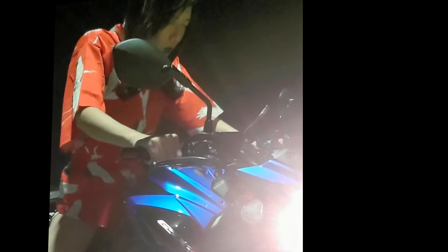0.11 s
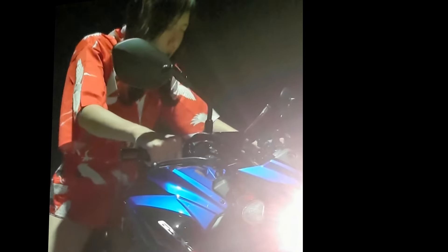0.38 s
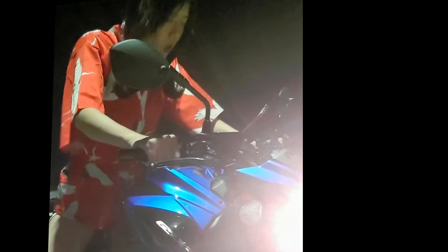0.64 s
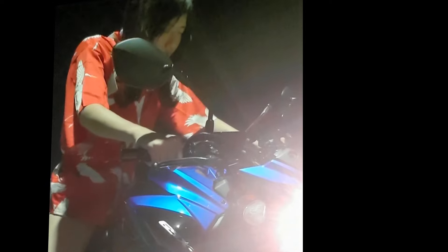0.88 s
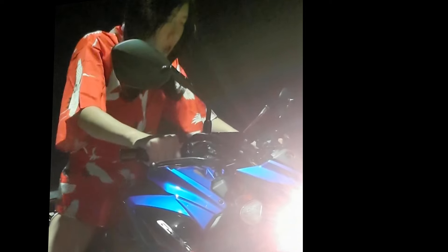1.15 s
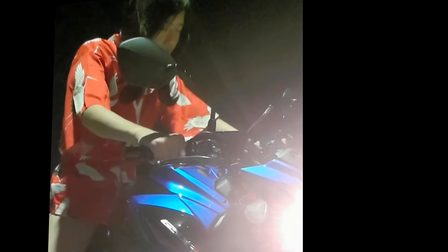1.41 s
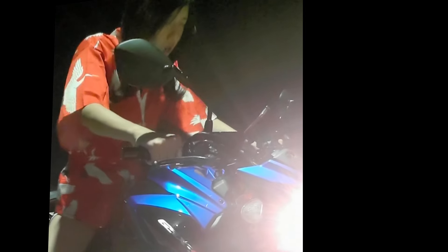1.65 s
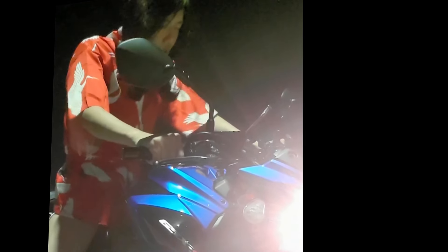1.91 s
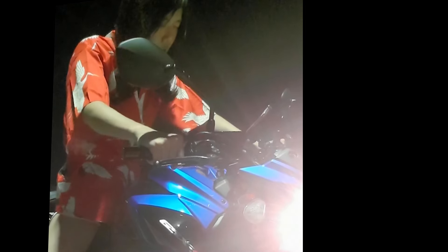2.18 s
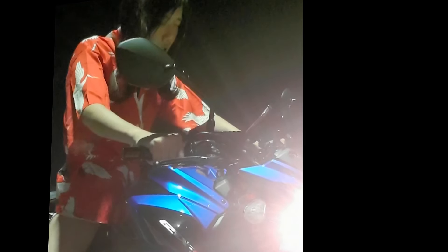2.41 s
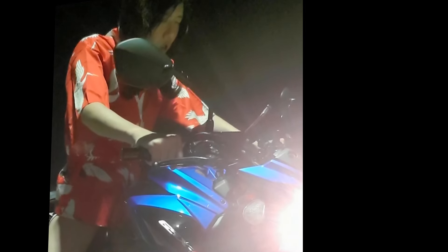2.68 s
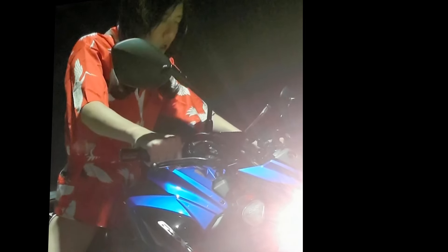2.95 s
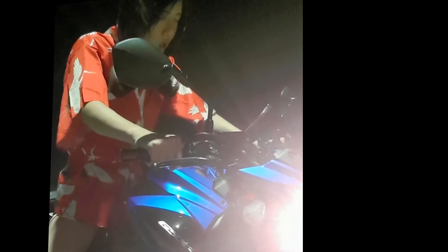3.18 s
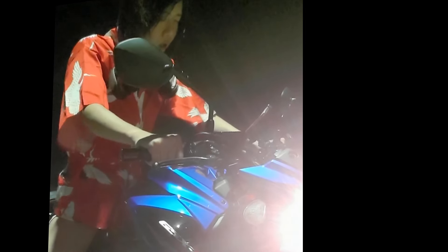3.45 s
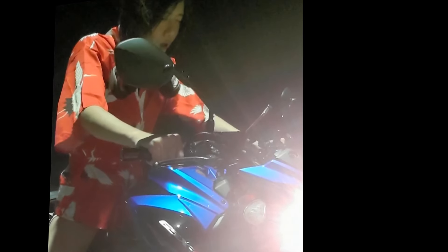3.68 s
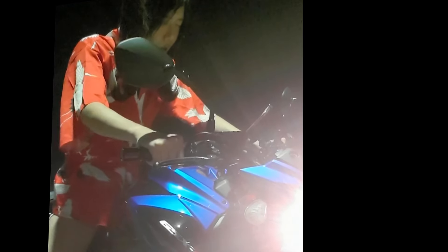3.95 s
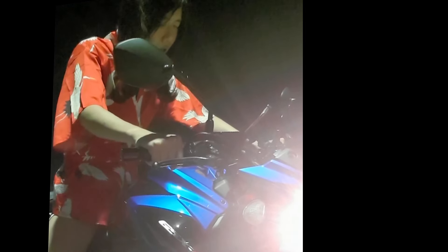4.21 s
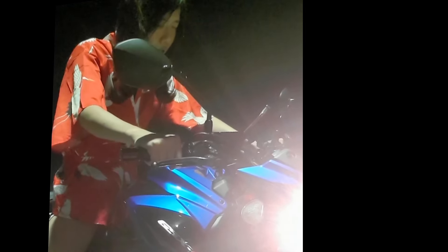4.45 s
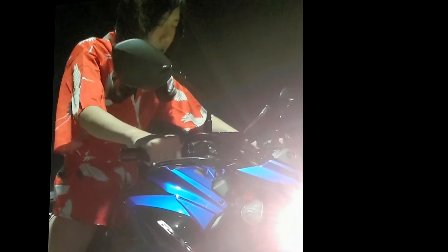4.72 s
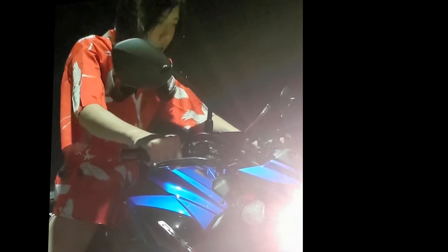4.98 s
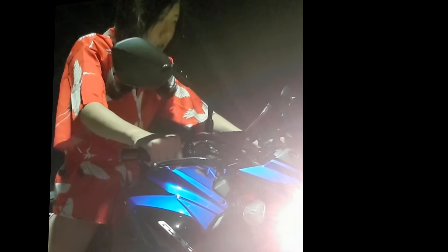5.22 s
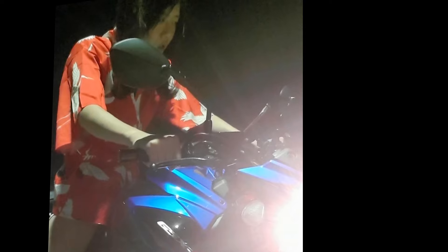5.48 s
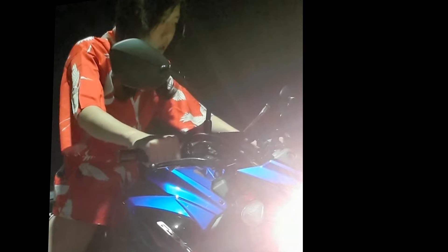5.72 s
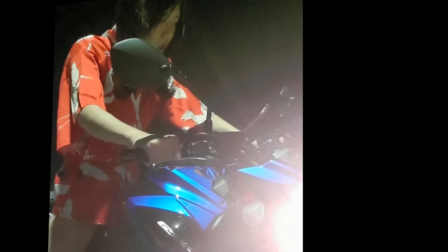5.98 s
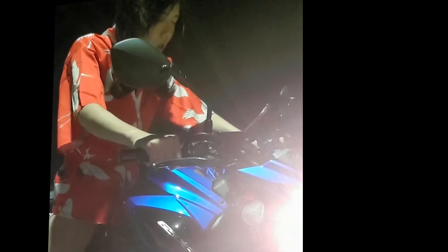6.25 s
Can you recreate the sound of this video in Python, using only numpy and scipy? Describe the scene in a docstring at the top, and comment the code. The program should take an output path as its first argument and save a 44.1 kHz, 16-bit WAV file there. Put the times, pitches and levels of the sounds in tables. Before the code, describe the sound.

Close outdoor motorcycle revving: four short growling bursts, a sagging uneven rumble, one weaker blip, a sputtering stumble, then a steady strong-weak throb.

```python
"""A motorcycle engine close by roars through four twists of the throttle, sinks and hunts, takes a fifth
twist, stumbles, catches again and settles into a steady strong-weak beat.
Firings give harmonic exhaust partials; uneven firings ring the silencer as thumps or half-rate partials.
Filtered noise and partials give the intake, rasp, overrun hiss and valve gear; sputters mark the stumble.
A little low-pitched air stirs on the two microphone ports."""
import sys
import numpy as np
from scipy import signal
from scipy.fft import rfft, irfft
from scipy.io import wavfile
from scipy.ndimage import uniform_filter1d

SR = 44100
rng = np.random.default_rng(int(sys.argv[2]) if len(sys.argv) > 2 else 0)


def to_wav(s):
    """Save 16-bit WAV."""
    ch = np.atleast_2d(s).T  # columns
    pcm = np.round(np.clip(ch, -1, 1) * 32767)  # PCM
    wavfile.write(sys.argv[1], SR, pcm.astype(np.int16))


def elevation(decibels):
    """Turn decibel levels (scalar or array-like) into linear amplitude ratios."""
    levels = np.asarray(decibels, float)
    return 10 ** (levels / 20)


N = 280917


def rms_one(x):
    """Energy normalisation: scale to rms 1."""
    return x / np.sqrt(np.mean(x ** 2) + 1e-20)


def in_time(rows):
    """Linear interpolation: columns of a curve table, sample by sample."""
    s, *columns = np.transpose(rows)
    return [np.interp(np.arange(N) / SR, s, c) for c in columns]


def at_hz(points, hz):
    """Logarithmic frequency: a table over frequency, read on a log axis."""
    table_hz, values = np.array(points)[:, 0], np.array(points)[:, 1]
    return np.interp(np.log(hz + 1), np.log(table_hz), values)


def smooth(x, seconds):
    """Moving average: a centred running mean."""
    return uniform_filter1d(x, max(int(seconds * SR), 1))


def trail(x, seconds):
    """First-order relaxation: follows x with a lag."""
    r = np.exp(-1 / (seconds * SR))
    return signal.lfilter([1 - r], [1, -r], x, zi=[r * x[0]])[0]


def resonate(x, modes):
    """Modal superposition: parallel resonances with alternating signs."""
    out = 0
    for k, (hz, width, level_db) in enumerate(modes):
        r = np.exp(-np.pi * width / SR)
        a = [1, -2 * r * np.cos(2 * np.pi * hz / SR), r * r]
        b = [(1 - r * r) / 2, 0, (r * r - 1) / 2]
        out = out + (-1) ** k * elevation(level_db) * signal.lfilter(b, a, x)
    return out


def per_firing(turns):
    """Cyclic variation: a random value for each unit of turns, joined by straight lines."""
    draws = rng.standard_normal(1000)
    return np.interp(turns, np.arange(len(draws)), draws)


LEFT_DB = -0.6   # left port relative to right
# Phase by which the left port leads the right. Each row: frequency in Hz, lead in radians.
LEFT_LEAD = [(60, .42), (120, .33), (300, .05), (650, -.35), (1210, -1.5), (1890, -2.1), (2670, -4),
             (5000, -4.5), (15000, -4.9)]


def ports(spectrum):
    """Interaural-like difference: the left port is a little softer, ahead in the bass, behind in the treble."""
    turn = elevation(LEFT_DB / 2) * np.exp(.5j * at_hz(LEFT_LEAD, np.fft.rfftfreq(N, 1 / SR)))
    return np.array([spectrum * turn, spectrum / turn])


# Casing resonances that lift the noise. Each row: frequency in Hz, width in Hz, lift in dB.
CASING = [(283, 33, 6.5), (717, 64, 5.5), (1870, 420, 2.5), (2417, 87, 5), (2840, 320, 2), (3640, 610, 3.5),
          (6740, 200, 0.5), (10400, 160, 2)]
# Incoherence of the two ports. Each row: frequency in Hz, share of power unlike in left and right (0-1).
DIFFUSE = [(200, .15), (600, .12), (1400, .25), (3000, .5), (8000, .6)]


def gated_noise(turns, spectrum, low_hz, high_hz, depth, scatter_db, tick_db):
    """Amplitude modulation: noise swells each cycle and ticks twice as valves seat; rms 1 in the band."""
    tick = elevation(tick_db + 2.3 * per_firing(np.floor(2 * turns))) * np.exp(-(2 * turns % 1) / 0.89)
    gate = 1 + depth * np.cos(2 * np.pi * turns) + tick
    white = rng.standard_normal((3, N))
    hz = np.fft.rfftfreq(N, 1 / SR)
    octaves = np.log2(np.clip(hz, low_hz, high_hz * 2) / low_hz)
    parts = 0
    for odd in range(2):   # alternate octaves scatter independently
        scattered = gate * elevation(scatter_db * per_firing(turns)) * white
        parts = parts + rfft(scattered) * np.abs(np.cos(np.pi / 2 * (octaves - odd)))
    lift_db = sum(db / (1 + (2 * (hz - f) / width) ** 2) for f, width, db in CASING)
    direct, left, right = parts * elevation(at_hz(spectrum, hz) + lift_db)
    unlike = np.clip(at_hz(DIFFUSE, hz), 0, 1)
    both = np.sqrt(1 - unlike) * ports(direct) + np.sqrt(unlike) * np.array([left, right])
    band = (hz > low_hz) & (hz < high_hz)
    return irfft(both, N) / np.std(irfft(both.mean(axis=0) * band, N))


# Regularity of the unevenness. Each row: time in seconds, share that is a strong-weak beat (0-1).
BEAT = [(0, .1), (4.9, .1), (5.2, .88), (6.37, .88)]
# Twists of the throttle. Each row: start of the climb in seconds, shutting in seconds,
# speed aimed at in firings per second, opening (0-1).
BLIPS = [(0.066, 0.243, 154.8, 0.88), (0.631, 0.846, 142.5, 0.57), (1.224, 1.456, 137.5, 0.65),
         (1.921, 2.091, 129.5, 0.45), (3.598, 3.784, 109.1, 0.4), (4.579, 4.74, 97, 0.02)]
# Speed the engine falls back to between twists. Each row: time in seconds, speed in firings per second.
SETTLED = [(0, 97), (.6, 92), (1.22, 82), (1.84, 77.5), (2.55, 78.5), (2.68, 75.1), (2.87, 66),
           (3.09, 58.5), (3.3, 55), (3.49, 47.5), (3.6, 51), (3.94, 84.8), (4.12, 74), (4.42, 53),
           (4.58, 47.4), (4.84, 82), (5.22, 75), (5.5, 77.5), (5.6, 75.6), (5.77, 78.6), (5.93, 78.5),
           (6.09, 85), (6.21, 82.5), (6.37, 85)]
# Hunting: each surge starts low and gains speed until the next. Each entry: start in seconds.
SURGES = [2.519, 2.609, 2.721, 2.86, 2.964, 3.07, 3.192, 3.301, 3.391, 3.5]
SAG_HZ_PER_S = 158   # speed lost once the throttle shuts
CATCH_S, THROTTLE_LAG_S = 0.061, 0.053   # throttle opens ahead of the climb; charge follows the grip
CLIMB_BEND = .85   # below 1 the climb is steepest at its start
FLYWHEEL_S = .04   # inertia rounds the speed peaks
SURGE_HZ, BEAT_WANDER_HZ = 10, .7   # speed gained in a surge; random wander on the full steady beat


def speed_and_throttle():
    """Rotational inertia: speed climbs on open throttle, sags to the settled speed, and hunts in surges."""
    t = np.arange(N) / SR
    settled, = in_time(SETTLED)
    per_s, grip = settled, np.zeros(N)
    for opened, shut, peak, opening in BLIPS:
        start = settled[int(opened * SR)]
        progress = np.clip((t - opened) / (shut - opened), 0, 1) ** CLIMB_BEND
        climb = (t >= opened) * (start + (peak - start) * progress)
        per_s = np.maximum(per_s, climb - SAG_HZ_PER_S * np.maximum(t - shut, 0))
        grip = grip + opening * (t > opened - CATCH_S) * (t < shut)
    starts = np.array(SURGES)
    sawtooth = np.interp(t, starts, np.arange(len(starts))) % 1 - .5
    hunting = (t > starts[0]) * (t < starts[-1]) * sawtooth
    wander = BEAT_WANDER_HZ * in_time(BEAT)[0] * per_firing(9 * t)
    speed = smooth(per_s + wander, FLYWHEEL_S) + SURGE_HZ * smooth(hunting, .015)
    return speed, trail(grip, THROTTLE_LAG_S)


NOISE_KNEE_HZ, NOISE_LAG_S = 76.4, 0.074   # in firings per second; in seconds


def octaves_raised(per_s):
    """Logarithmic scaling with lag: octaves of speed above the knee, trailing the engine."""
    return trail(np.maximum(np.log2(per_s / NOISE_KNEE_HZ), 0), NOISE_LAG_S)


# Exhaust tone with the throttle shut, booming near the silencer resonance.
# Each row: speed in firings per second, level in dB.
BOOM = [(45, -12), (55, -17.5), (65, -12.5), (76, -11.5), (84, -15), (95, -17), (120, -21.5), (155, -13)]
# Firing strength as the engine nearly dies and recovers. Each row: time in seconds, level in dB.
STRENGTH = [(0, -3.5), (2.3, 0.5), (2.5, 0), (3.2, 1.5), (3.45, 2), (3.68, 0.5), (3.78, -5.5), (3.9, -4),
            (4.12, -2.5), (4.3, -2.5), (4.37, -7.5), (4.6, -11), (4.88, -10), (5.0, -2), (5.3, 0.5),
            (6.37, 0.5)]
# Bouts of uneven firing, heard as heavy thumps. Each row: time in seconds, peak level in dB.
THUMPS = [(0.089, -7), (0.28, -4.5), (0.419, -11.5), (0.702, -6.5), (0.86, -9), (0.999, -4), (1.171, -6),
          (1.333, -5), (1.479, -9.5), (1.627, -6), (1.731, -7.5), (1.926, -7), (1.978, -10.5),
          (2.119, -6.5), (2.233, -3), (2.341, -7), (2.472, -4), (2.64, -8.5), (3.899, -6), (4.529, -14.5),
          (4.718, -11.5), (4.831, -13.5), (5.002, -11)]
LOAD_DB = 5   # added to the tone at full throttle
THUMP_FADE_DB_PER_S = 158   # either side of a bout
UNEVEN_DB, LIMP_DB = -19, -16   # between bouts; on the steady beat
UNEVEN_DB_PER_OCTAVE, UNEVEN_FOLLOWS = 8.5, 0.48   # growth with raised speed; share of the strength swing


def exhaust_levels(per_s, throttle):
    """Source strength: tone dB from speed, load and strength; unevenness dB from its bouts and between."""
    t = np.arange(N) / SR
    share, = in_time(BEAT)
    strength_db, = in_time(STRENGTH)
    bouts_db = np.max([db - THUMP_FADE_DB_PER_S * abs(t - s) for s, db in THUMPS], axis=0)
    loose_db = UNEVEN_DB + UNEVEN_DB_PER_OCTAVE * octaves_raised(per_s) + UNEVEN_FOLLOWS * strength_db
    steadiness = (share - share.min()) / np.ptp(share)
    between_db = loose_db + (LIMP_DB - loose_db) * steadiness
    tone_db = at_hz(BOOM, per_s) + LOAD_DB * throttle + strength_db
    return tone_db, np.maximum(bouts_db, between_db)


# For each noise: level at low speed, growth per octave of raised speed, full throttle, full steady beat (dB),
# then the share of the strength swing that it follows.
RASP_DB, RASP_DB_PER_OCTAVE, RASP_LOAD_DB, RASP_BEAT_DB, RASP_FOLLOWS = -30.5, 4, 5.5, 2, 0.14
CLATTER_DB, CLATTER_DB_PER_OCTAVE, CLATTER_LOAD_DB, CLATTER_BEAT_DB, CLATTER_FOLLOWS = -59, 13, 8, -2, 0.47


def noise_levels(per_s, throttle):
    """Flow and impact noise scaling: rasp and clatter dB from speed, load, strength and steady beat."""
    share, = in_time(BEAT)
    strength_db, = in_time(STRENGTH)
    raised = octaves_raised(per_s)
    rasp_db = RASP_DB + RASP_DB_PER_OCTAVE * raised + RASP_LOAD_DB * throttle
    rasp_db = rasp_db + RASP_BEAT_DB * share + RASP_FOLLOWS * strength_db
    clatter_db = CLATTER_DB + CLATTER_DB_PER_OCTAVE * raised + CLATTER_LOAD_DB * throttle
    clatter_db = clatter_db + CLATTER_BEAT_DB * share + CLATTER_FOLLOWS * trail(strength_db, 0.19)
    return rasp_db, clatter_db


# Missed firings. Each row: time in seconds, dip in dB, length in seconds before 3 ms is added.
MISFIRES = [(0.579, -27, 0.032), (2.751, -3.5, 0.015), (2.862, -7, 0.01), (2.958, -8.5, 0.022),
            (3.073, -15.5, 0.016), (3.174, -9, 0.0072), (3.382, -20, 0.01), (3.446, -13, 0.026),
            (3.508, -28, 0.035), (3.558, -13, 0.0092), (3.972, -20, 0.035), (4.129, -25.5, 0.018),
            (4.375, -25, 0.06), (4.561, -15, 0.033), (4.792, -19, 0.03), (4.903, -4.5, 0.066),
            (4.966, -37.5, 0.011), (5.114, -5, 0.064), (6.061, -13, 0.0018)]


def misfire_db():
    """Interrupted excitation: short bell-shaped gaps in dB where a firing is missed."""
    t = np.arange(N) / SR
    return sum(db * np.exp(-(2 * (t - s) / (length + 0.003)) ** 2) for s, db, length in MISFIRES)


# Low partials of the tone. Each row: multiple of the firing rate, relative level in dB.
TONE = [(1, 4.5), (2, -20.5), (3, -24.5), (4, -37.5), (5, -33.5)]
# Silencer resonances. Each row: frequency in Hz, width in Hz, level in dB.
SILENCER = [(65.5, 29.8, 4), (50.3, 35, -2.5), (150.3, 12, -8.5), (309.6, 22, -18.5)]
STUMBLE_BELOW_HZ, STUMBLE_TURNS = 88, .07   # firings per second; timing scatter in firing periods
SHARPEN_BELOW_HZ, SHARPEN_DB_PER_OCTAVE = 70, 19   # slow firings are sharper: upper partials rise


def exhaust_tone(per_s, turns, tone_db):
    """Harmonic series: partials of the firing rate, lifted at resonances, jittered at low speed, gapped."""
    share, = in_time(BEAT)
    stumble = (1 - share) * np.clip((STUMBLE_BELOW_HZ - per_s) / 20, 0, 1)
    fired = turns + STUMBLE_TURNS * stumble * per_firing(turns)
    sharp = elevation(SHARPEN_DB_PER_OCTAVE * np.maximum(np.log2(SHARPEN_BELOW_HZ / per_s), 0))
    tone = 0
    for k, level_db in TONE:
        # only the two upper silencer resonances lift the partials
        lift = 1 + sum(2.28 / (1 + (2 * (k * per_s - hz) / width) ** 2) for hz, width, _ in SILENCER[2:])
        waver_db = (.9 + 1.2 * stumble) * per_firing(turns)
        colour = lift * sharp if k > 1 else 1
        tone = tone + elevation(level_db + waver_db) * colour * np.cos(2 * np.pi * k * fired)
    return np.sqrt(2) * elevation(tone_db + misfire_db()) * tone


# Partials of the strong-weak beat. Each row: multiple of the firing rate, relative level in dB.
LIMP = [(.5, 0), (1.5, -4), (2.5, -16.5), (3.5, -27.5)]
LIMP_WAVER_DB = 1.5


def uneven_firing(per_s, turns, uneven_db):
    """Subharmonics: random firing differences ring the silencer; regular ones give half-rate partials."""
    share, = in_time(BEAT)
    fired = np.diff(np.floor(turns), prepend=0) * per_firing(np.floor(turns))
    thumps = resonate(resonate(fired + 1e-18, SILENCER), [(68, 36, 0), (150, 40, -11), (290, 50, -18)])
    thumps = thumps / np.sqrt(smooth(smooth(thumps ** 2, 0.17), 0.17) + 1e-20)
    limp = 0
    for k, db in LIMP:
        waver = elevation(db + LIMP_WAVER_DB * per_firing(turns / 4))
        pipe = 1 + 1.5 / (1 + ((k * per_s - 292) / 12) ** 2)   # lift near a pipe resonance
        limp = limp + waver * pipe * np.cos(2 * np.pi * k * turns + .85 * k - 1)
    return elevation(uneven_db + misfire_db() / 2) * ((1 - share) * thumps + share * np.sqrt(2) * limp)


# Air box resonances. Each row: frequency in Hz, width in Hz, level in dB.
INTAKE = [(384.5, 10, -5), (567.4, 33, 0), (691.5, 30, -5.5), (862, 18, -11.5), (1060, 160, -19.5)]
# Partials through the air box. Each row: multiple of the firing rate, relative level in dB.
GROWL = [(2, 4), (3, 2), (4, 2), (5, 0), (6, 2), (7, -2), (8, -6)]
REV_FROM_HZ, REV_FULL_HZ = 89.3, 120.5   # firings per second over which the intake comes in
OPEN_SHARE = .7   # how much an open throttle sounds the air box even at low speed
INTAKE_DB, INTAKE_LOAD_DB = -40, 14   # gulps; added at full throttle
GROWL_DB, GROWL_LOAD_DB = -36, 13   # partials; added at full throttle


def intake(per_s, throttle, turns):
    """Cavity resonance: gulps of air and firing partials ring the air box, most on open throttle."""
    revved = np.clip((per_s - REV_FROM_HZ) / (REV_FULL_HZ - REV_FROM_HZ), OPEN_SHARE * throttle, 1)
    gulps = (1 + 0.87 * np.cos(2 * np.pi * turns)) * elevation(2.0 * per_firing(turns)) * rng.standard_normal(N)
    rung = resonate(resonate(gulps, INTAKE), [(570, 2400, 0)])
    out = elevation(INTAKE_DB + INTAKE_LOAD_DB * throttle) * rms_one(rung)
    for k, level_db in GROWL:
        box = .4 + sum(elevation(db) / (1 + (2 * (k * per_s - hz) / width) ** 2) for hz, width, db in INTAKE)
        growl_db = GROWL_DB + GROWL_LOAD_DB * throttle + level_db + 3 * per_firing(turns / 2)
        out = out + elevation(growl_db) * box * np.cos(2 * np.pi * k * turns)
    return revved * out


# Exhaust rasp spectrum. Each row: frequency in Hz, relative density in dB per Hz.
RASP = [(100, -16.5), (170, -2.5), (256, -3.5), (299, -10), (426, -8), (710, -13), (928, -13.5),
        (3460, -36.5), (5000, -46.5), (6500, -97.5)]


def exhaust_rasp(turns, rasp_db):
    """Turbulent flow noise: low and middle noise modulated over each pair of firings."""
    noise = gated_noise(turns / 2, RASP, 267.0, 1700, depth=0.17, scatter_db=2.3, tick_db=-8.5)
    return elevation(rasp_db - 3.0) * noise


# Valve clatter spectrum. Each row: frequency in Hz, relative density in dB per Hz.
CLATTER = [(880, -32.5), (1500, -3.5), (1830, -4.5), (2180, -6), (2450, -7.5), (3530, -12.5), (5660, -24.5),
           (6630, -19), (7840, -24.5), (10500, -20.5), (15800, -36)]


def valve_clatter(turns, clatter_db):
    """Structure-borne noise: bright noise modulated over each pair of firings."""
    noise = gated_noise(turns / 2, CLATTER, 4360, 11300, depth=0.18, scatter_db=2.0, tick_db=-18.0)
    return elevation(clatter_db) * noise


def whistle(per_s, clatter_db):
    """Narrow-band resonance: a high hiss that comes only at raised speed."""
    revved = np.clip((per_s - REV_FROM_HZ) / 25, 0, 1)
    hiss = resonate(resonate(rng.standard_normal(N), [(8700, 450, 0)]), [(8700, 450, 0)])
    return elevation(clatter_db - 6) * revved * rms_one(hiss)


# Pipe resonances of the overrun hiss. Each row: frequency in Hz, width in Hz, level in dB.
OVERRUN = [(900, 79, 0.5), (1050, 99, -3.5), (1750, 270, -8.5)]
# Unburnt gas left in the pipe after each twist. Each row: time in seconds, change of the hiss in dB.
UNBURNT = [(.4, -5), (1.0, 2), (1.6, 4.5), (2.25, -0.5), (3.85, -13)]
OVERRUN_DB = -32.5


def overrun(per_s, throttle, turns):
    """Pipe-filtered turbulence: with the throttle shut at speed, unburnt gas hisses in the pipe."""
    coasting = np.clip((per_s - REV_FROM_HZ) / 30, 0, 1) * np.clip(1 - 1.5 * throttle, 0, 1)
    level_db = OVERRUN_DB + in_time(UNBURNT)[0] + 0.89 * per_firing(turns / 2)
    return elevation(level_db) * coasting * rms_one(resonate(rng.standard_normal(N), OVERRUN))


# Loose valve gear on the casing. Each row: frequency in Hz, width in Hz, level in dB.
RATTLE = [(3500, 130, 0), (3010, 150, -1.6), (2490, 85, -2), (1600, 75, 1.6)]
TAPS_PER_FIRING = 1.5   # before bunching
RATTLE_DB = -52.5


def rattle(per_s, turns):
    """Random impact excitation: valve gear taps bunch after alternate firings, drawn apart for each port."""
    bunched = 3 * np.exp(-(turns / 2 % 1) / .35) * elevation(5 * per_firing(turns / 2))
    struck = rng.random((2, N)) < TAPS_PER_FIRING * per_s * bunched / SR
    sizes = elevation(2.5 * np.minimum(rng.exponential(1, (2, N)), 4)) * rng.choice([-1, 1], (2, N))
    return elevation(RATTLE_DB) * rms_one(resonate(struck * sizes + 1e-18, RATTLE))


# Casing rings, fullest on the steady beat. Each row: frequency in Hz, width in Hz, level in dB.
KNOCK = [(717, 44, -2.5), (660, 35, -1), (860, 110, -6)]
KNOCK_DB = -39.5


def knock(turns):
    """Impulsive modal excitation: each firing knocks the casing, some harder, loudest on the steady beat."""
    share, = in_time(BEAT)
    force = np.exp(-(turns % 1) / .25) * elevation(1.8 * per_firing(np.floor(turns)))
    blows = force * rng.standard_normal(N)
    return elevation(KNOCK_DB) * share * rms_one(resonate(blows, KNOCK))


def sizzle(turns, clatter_db):
    """Pulsed jet noise: alternate firings puff very high hiss, fullest on the steady beat."""
    share, = in_time(BEAT)
    puffs = (.4 + np.exp(-(turns / 2 % 1) / .35)) * elevation(2.5 * per_firing(np.floor(turns / 2)))
    hiss = resonate(resonate(puffs * rng.standard_normal((2, N)), [(11600, 1300, 0)]), [(11600, 1300, 0)])
    return elevation(clatter_db - 0.5) * share * rms_one(hiss)


# Air on the ports. Each row: time in seconds, level in dB.
AIR = [(0, -22), (.2, -35.5), (3.1, -38.5), (3.4, -19.5), (5.15, -16), (5.25, -30.5), (6.37, -27)]
# Puffs of air. Each row: time in seconds, rise above the rest in dB.
PUFFS = [(4.74, 5.1)]
PUFF_S = 0.087   # rise time, and fall time


def air_on_ports():
    """Incoherent pressure fluctuation: lumpy low noise, its own in each channel."""
    t = np.arange(N) / SR
    level_db = in_time(AIR)[0] + sum(db * np.clip(1 - abs(t - s) / PUFF_S, 0, 1) for s, db in PUFFS)
    lumps = resonate(rng.standard_normal((2, N)), [(30, 16, -4), (58, 40, -1), (170, 150, -16)])
    low_pass = signal.butter(2, 160, fs=SR, output="sos")
    return elevation(level_db) * rms_one(signal.sosfilt(low_pass, lumps))


# Pipe resonance rung by each surge. Each row: frequency in Hz, width in Hz, level in dB.
SURGE_RING = [(306.6, 27, 0)]
SURGE_PUFF_S, SURGE_PUFF_DB = 0.033, -31.5   # delay to the peak, and bell half-width; level


def surge_puffs():
    """Noise-driven resonance: each surge begins with a soft puff that rings the pipe."""
    t = np.arange(N) / SR
    bells = sum(np.exp(-((t - s - SURGE_PUFF_S) / SURGE_PUFF_S) ** 2) for s in SURGES)
    ring = resonate(resonate(rng.standard_normal(N), SURGE_RING), SURGE_RING)
    return elevation(SURGE_PUFF_DB) * bells * ring / np.sqrt(smooth(smooth(ring ** 2, .04), .04) + 1e-20)


# Louder taps of the valve gear. Each row: time in seconds, nominal level in dB before random scatter.
TAPS = [(3.5179, -31.5), (3.7123, -35.5), (4.4892, -37), (5.2373, -35.5), (5.3568, -32), (5.4124, -35),
        (5.4518, -30.5), (5.5614, -34), (5.6634, -33), (6.2632, -28.5)]


def taps():
    """Impulse response: single taps strike the rattle and casing modes, each mode with its own strength."""
    s, peak_db = np.transpose(TAPS)
    modes = RATTLE + KNOCK
    strengths_db, out = 3 * rng.standard_normal((len(s), len(modes))), 0
    for mode, strength_db in zip(modes, strengths_db.T):
        blows = np.zeros(N) + 1e-18
        # dividing by the mode's width evens out the peaks
        blows[(s * SR).astype(int)] = elevation(peak_db + strength_db) * SR / (2 * np.pi * mode[1])
        out = out + resonate(blows, [mode])
    return signal.sosfilt(signal.butter(4, 2800, fs=SR, output="sos"), out)


# Late charges going off in the pipe. Each row: time in seconds, relative strength in dB.
SPUTTERS = [(3.998, -19), (4.143, -7.5), (4.335, -11), (4.436, -20.5), (4.697, -10.5)]


def sputters():
    """Impulse response: a late charge in the pipe is one dull blow on fixed low resonances."""
    s, peak_db = np.transpose(SPUTTERS)
    blows = np.zeros(N) + 1e-18
    blows[(s * SR).astype(int)] = elevation(peak_db)
    ring = resonate(resonate(blows, [(105, 22, 0), (165, 30, -3), (215, 40, -10)]), [(130, 110, 0)])
    return ring * elevation(peak_db.max() + 2.0) / np.abs(ring).max()


def scene():
    """Superposition: engine layers driven by speed, heard at the two ports, with air on top."""
    per_s, throttle = speed_and_throttle()
    tone_db, uneven_db = exhaust_levels(per_s, throttle)
    rasp_db, clatter_db = noise_levels(per_s, throttle)
    turns = np.cumsum(per_s) / SR   # counts firings
    exhaust = exhaust_tone(per_s, turns, tone_db) + uneven_firing(per_s, turns, uneven_db)
    exhaust = exhaust + overrun(per_s, throttle, turns) + surge_puffs() + sputters()
    near = exhaust + intake(per_s, throttle, turns) + whistle(per_s, clatter_db) + knock(turns) + taps()
    engine = irfft(ports(rfft(near)), N) + exhaust_rasp(turns, rasp_db) + valve_clatter(turns, clatter_db)
    return engine + rattle(per_s, turns) + sizzle(turns, clatter_db) + air_on_ports()


def top_cut(x):
    """Nothing passes above the cut-off."""
    return signal.sosfilt(signal.butter(12, 15910, fs=SR, output="sos"), x)


def record(dry):
    """High-pass filtering and soft saturation: deepest bass is cut, loud peaks round off at full scale."""
    cut = signal.sosfilt(signal.butter(2, 19, "high", fs=SR, output="sos"), dry)
    mix = cut / (1 + cut ** 6) ** (1 / 6)
    return top_cut(mix)


dry = scene()
out = record(dry)
to_wav(out)
```